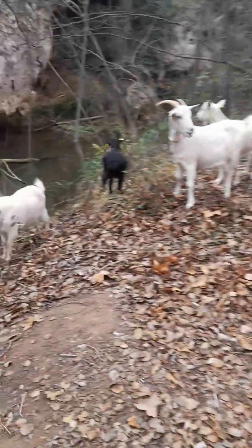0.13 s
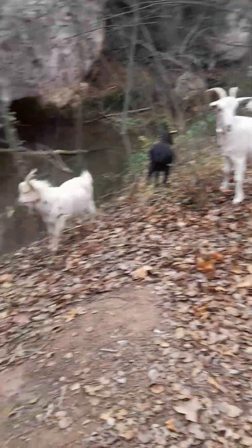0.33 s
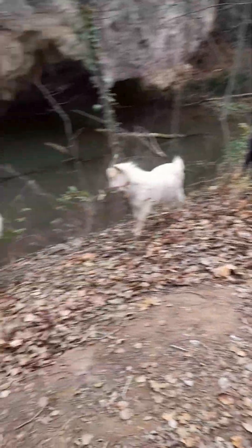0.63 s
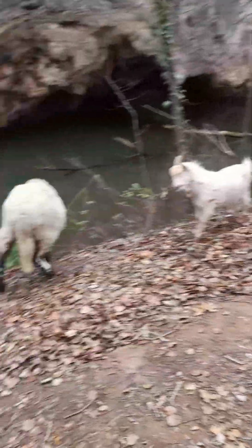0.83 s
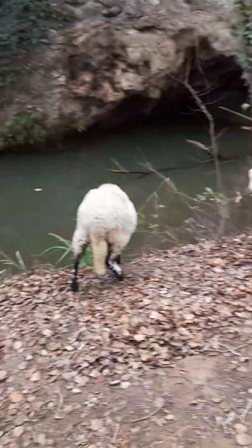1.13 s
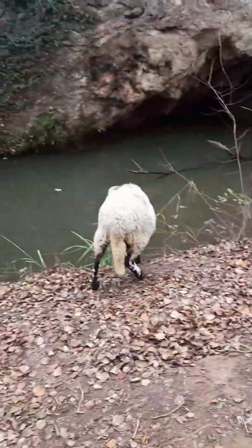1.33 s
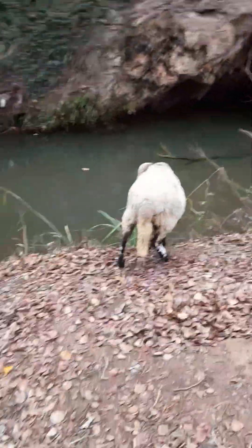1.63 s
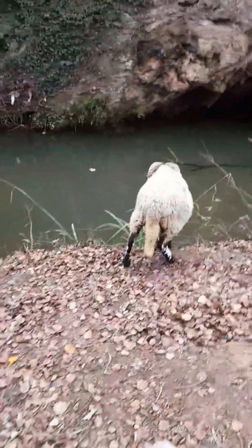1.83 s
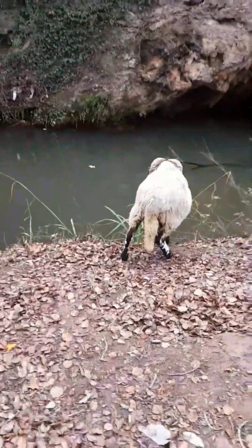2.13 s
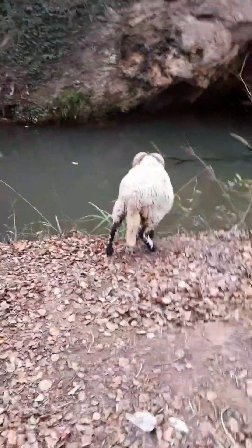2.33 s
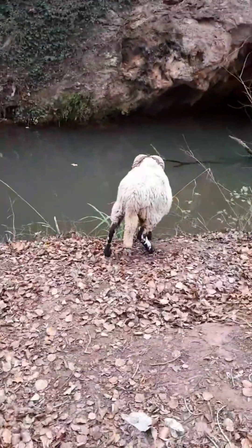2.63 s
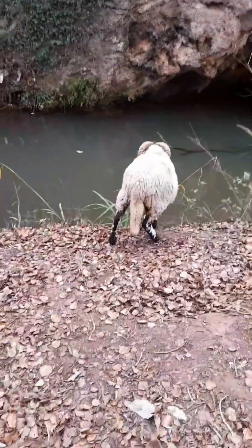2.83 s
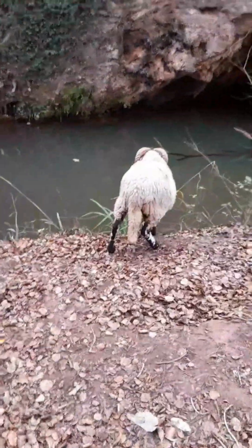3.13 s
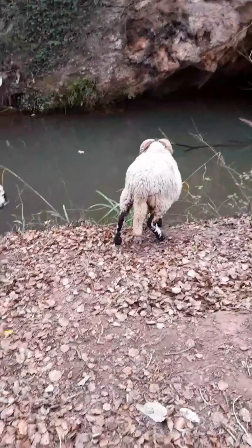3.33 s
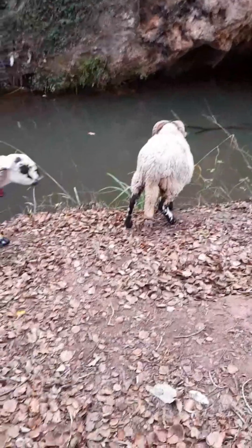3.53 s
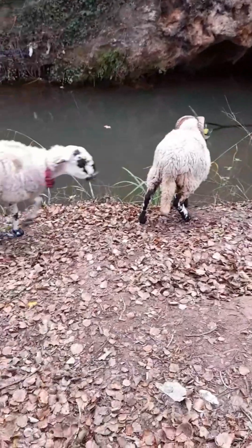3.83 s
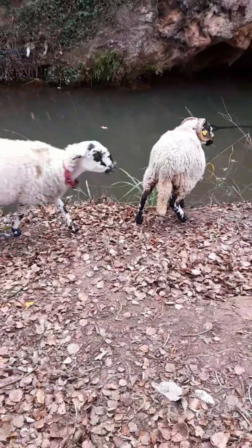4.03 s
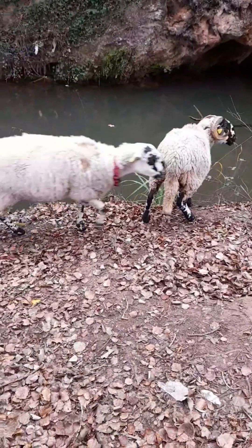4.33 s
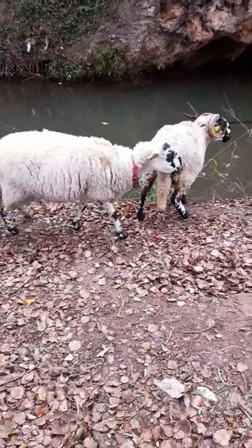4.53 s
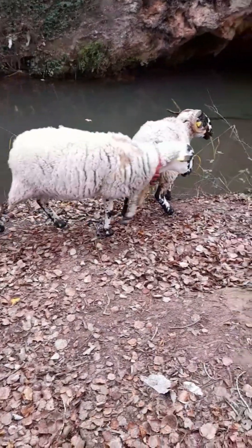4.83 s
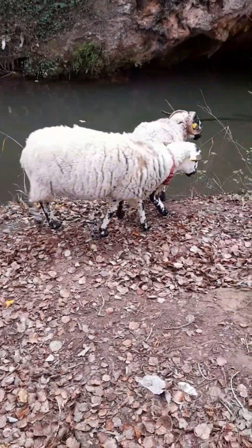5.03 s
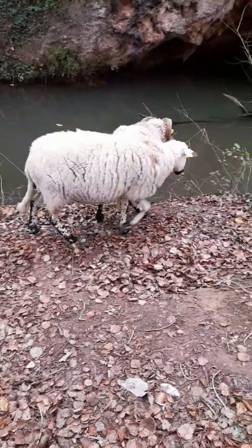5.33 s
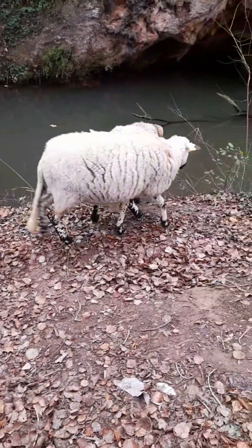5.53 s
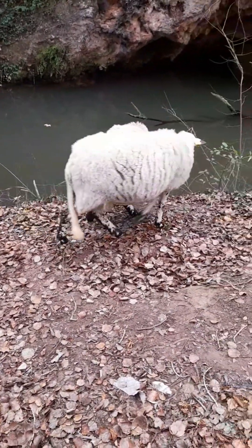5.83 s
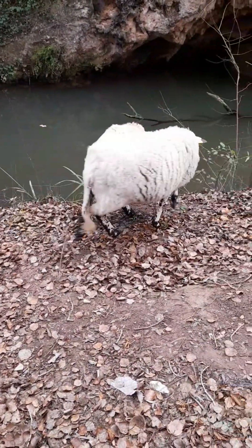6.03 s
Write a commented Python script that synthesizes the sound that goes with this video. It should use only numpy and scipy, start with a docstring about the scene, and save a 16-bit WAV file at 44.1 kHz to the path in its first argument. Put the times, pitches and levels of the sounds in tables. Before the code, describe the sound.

In a quiet outdoor spot, dry leaves crunch under shoes right by the microphone, with a short squeak of rubber midway through the steps. The walking ends, and lighter sounds take over from a little way in front: sheep treading and dragging their legs through the leaves in brief, crisp bursts with small gaps. Sharp little stem snaps are scattered throughout, over a faint hush and barely audible clothing.

```python
"""Footsteps and sheep in dry leaves

On the bank of a still stream a walker takes a few steps and stops, one sole squeaking by stick-slip
friction. Then sheep a few metres ahead shuffle through the litter. Each tread is a swarm of tiny
brittle fractures over a thud of soil; single stems snap, and clothes stir in a faint outdoor hush."""
import sys
import numpy as np
from scipy import signal
from scipy.fft import rfft, irfft, next_fast_len
from scipy.io import wavfile
from scipy.ndimage import uniform_filter1d, map_coordinates

SR = 44100
rng = np.random.default_rng(int(sys.argv[2]) if len(sys.argv) > 2 else 0)


def log_audio(samples):
    """Write samples as a 16-bit WAV file to the path given in sys.argv[1]."""
    # one column per channel
    frames = np.atleast_2d(samples).T
    # limit to full scale, then quantise
    limited = np.clip(frames, -1, 1)
    pcm = np.round(limited * 32767).astype(np.int16)
    wavfile.write(sys.argv[1], SR, pcm)


N = 273420
TIME = np.arange(N) / SR
FOOT_LAG_MS = 0.495  # the walker's feet reach the left ear this much later

# The push of the shoes through the leaves. Each row: time in seconds, relative level in dB.
SHOE_PUSH = [(0.0, -44), (0.14, -36.5), (0.27, -35.5), (0.36, -37), (0.415, -32.5), (0.445, -43),
             (0.54, -53), (0.635, -47), (0.685, -52.5), (0.75, -47.5), (0.92, -43), (1.06, -36.5),
             (1.17, -38.5), (1.28, -37), (1.42, -41), (1.6, -41.5), (1.8, -41.5), (1.92, -58)]
# Snapping stems. Each row: start in seconds, level in dB, centre frequency in Hz,
# left minus right level in dB, splintering time in ms.
STEM_SNAPS = [(0.0823, -31, 8000, -10, .8), (0.153, -29.5, 1950, -3, 3), (0.1627, -32, 4090, -8, 2.7),
              (0.1794, -32, 4000, -1, 1.5), (0.2381, -22, 9600, -13, 0.87), (0.2622, -25, 10600, -8, 1),
              (0.332, -24, 7800, -11, 2.1), (0.3916, -29, 10400, -9, 1), (0.3994, -23, 10400, -8, 2.5),
              (0.41, -32, 2400, 2, 1.7), (0.4693, -39, 10200, -9, .8), (0.477, -28.5, 9700, -13, .8),
              (0.4978, -42, 8000, -13, 0.83), (0.5759, -29.5, 11900, -5, 1.1), (0.6354, -42, 3520, 2, 2),
              (0.7798, -33, 8000, -11, 1.3), (0.8765, -25, 10400, -11, 1.6), (0.8963, -35, 8500, -9, .8),
              (0.9331, -33, 9500, -8, 0.93), (1.17, -31, 4200, -3, 1.8), (1.2666, -24.5, 11000, -10, .6),
              (1.2893, -23, 10500, -11, 1), (1.3196, -29, 12000, -9, 1.2), (1.3685, -30, 12000, -9, .7),
              (1.488, -30, 13500, -9, .6), (1.4912, -27.5, 12000, -13, .7), (1.5317, -34, 13500, -12, .6),
              (1.5409, -25, 12200, -20, 0.89), (1.552, -35, 10100, -18, 0.49), (1.585, -37, 4500, -8, 1.5),
              (1.6504, -31, 10200, -15, 0.73), (1.6672, -33.5, 6800, -12, 1.5),
              (1.6763, -25, 6450, -10, 0.87), (1.703, -30, 1900, -15, 1.3), (1.709, -32.5, 2300, -2, 1.8),
              (1.714, -26, 12300, -10, 0.81), (1.7353, -28.5, 11000, -8, .6), (1.7392, -29, 9600, -7, 2),
              (1.7857, -35.5, 3500, -1, 1.6), (1.7963, -35.5, 2500, -9, 2), (1.803, -36, 3500, -6, 2),
              (1.815, -34, 10000, -8, 1.1), (1.8264, -38, 9000, -4, .8), (1.851, -37.5, 7000, -6, 0.76),
              (1.8574, -30.5, 6300, -10, 1.1), (1.875, -38, 6300, -9, .8), (1.8935, -37.5, 10100, -2, 1.1),
              (1.9036, -45, 9500, -6, 0.5), (1.9305, -39, 10400, -2, .6), (2.0415, -37, 7500, -10, .8),
              (2.1934, -46, 8350, -19, .8), (2.239, -55, 4970, -10, 1), (2.255, -50, 4970, -14, 1.6),
              (2.4317, -34, 10400, -5, 0.76), (2.4672, -33, 8500, -9, 1.1), (2.5723, -35.5, 7100, -7, 0.76),
              (2.5894, -35, 9500, -4, .8), (2.606, -46, 2520, -4, 1.5), (2.783, -34, 13200, -11, 0.68),
              (2.9384, -37.5, 9900, -4, 1.5), (2.9752, -46, 9650, -3, 0.88), (2.9906, -32, 6800, -11, 1.13),
              (3.009, -35, 12100, -11, .8), (3.0734, -50, 6300, -4, 1.05), (3.1151, -38, 12000, -2, .7),
              (3.1902, -42.5, 3470, -2, 1.9), (3.3817, -41, 10000, -7, 1.8), (3.4274, -40, 9600, -2, .8),
              (3.497, -42.5, 9500, 5, .8), (3.5257, -38, 10300, -3, 0.72), (3.6697, -49, 8000, -4, .8),
              (3.8103, -31, 11000, -3, 0.9), (3.868, -36, 6940, -6, 1.2), (3.8805, -27.5, 8050, 0, 1.5),
              (3.9384, -37, 9000, -6, 1.5), (3.9484, -42, 12500, -4, 0.89), (4.0385, -37.5, 10000, 0, 1.9),
              (4.2093, -45.5, 4200, 0, 0.54), (4.3908, -40, 11500, -4, 1.2), (4.6531, -38, 9500, 1, 0.92),
              (4.9205, -48, 9000, 0, 1), (5.055, -50, 9500, -4, .7), (5.15, -49, 9500, -7, 0.85),
              (5.1646, -47, 10500, -9, 0.76), (5.2237, -49, 8500, -5, 1.5), (5.2632, -30.5, 5030, -4, 1),
              (5.5004, -45, 9000, -12, 0.95), (5.5566, -41, 3240, -1, 1.2), (5.575, -33, 5530, -4, 1.45),
              (5.6254, -28, 10100, 2, 0.54), (5.6325, -31, 11500, -3, 3.6), (5.646, -46, 9000, -1, .7),
              (5.6757, -42.5, 6500, -4, 0.71), (5.762, -37, 5840, 0, 0.8), (5.859, -48, 4850, -5, 1.1),
              (6.0738, -45, 9000, -2, 0.69), (6.084, -37, 7500, -2, 0.9), (6.118, -31, 7600, -2, 1.32),
              (6.193, -36, 12000, -2, 1)]
# A heel or sole takes the weight. Each row: peak time in seconds, thud in dB, crunch in dB.
FOOTFALL_PEAKS = [(0.105, -56, -46), (0.2, -57, -56), (0.41, -65, -46), (1.07, -51, -48),
                  (1.105, -52.5, -54), (1.168, -55.5, -50), (1.27, -64, -46), (1.325, -60, -58),
                  (1.54, -61, -53), (1.585, -57, -48), (1.665, -63, -47), (1.708, -57, -41),
                  (1.795, -60, -44), (1.856, -52, -48)]
# The squeak. Each row: time in seconds, pitch in Hz, relative levels of fundamental and overtones in dB.
SQUEAK_CURVE = [(1.278, 1463, -70, -80), (1.288, 1594, -35, -48), (1.297, 1688, -31, -26),
                (1.322, 1680, -36, -24.5), (1.342, 1708, -34.5, -33), (1.364, 1670, -36, -36),
                (1.381, 1585, -29.5, -42), (1.397, 1405, -56, -42), (1.418, 1460, -70, -46)]
# Its overtones, with a half order from uneven slips. Each row: multiple of the pitch, relative dB.
SQUEAK_OVERTONES = [(2.5, -19), (3, -14), (4, 0), (5, -21), (6, -12), (7, -6), (8, -9), (9, -13)]
# The sliding sole's chirps. Each row: start and end in seconds, first and last pitch in Hz, relative dB.
SOLE_CHIRPS = [(1.212, 1.24, 9600, 8150, -28), (1.232, 1.258, 2250, 2170, -41),
               (1.258, 1.289, 2185, 2300, -38), (1.264, 1.365, 9700, 9380, -33),
               (1.328, 1.364, 11170, 10950, -33), (1.318, 1.362, 13100, 12800, -34),
               (1.33, 1.358, 4250, 4220, -43), (1.379, 1.408, 2520, 2180, -41),
               (1.378, 1.42, 1130, 1180, -41), (1.405, 1.447, 1660, 1880, -40),
               (1.38, 1.445, 6800, 7000, -41)]
# The stirring of the walker's clothes. Each row: time in seconds, relative level in dB.
CLOTHES_STIR = [(1.95, -71), (2.33, -86), (2.45, -69.5), (2.68, -66), (2.85, -89), (3.03, -81.5),
                (3.32, -65.5), (3.68, -78.5), (3.97, -75.5), (4.3, -82), (5.06, -85), (5.27, -71.5),
                (5.7, -77), (5.95, -86), (6.2, -70)]
# Legs dragging through leaves. Each row: start in seconds, end in seconds, relative level in dB.
LEG_DRAGS = [(1.898, 2.26, -49), (2.334, 2.562, -46), (2.62, 2.735, -43.5), (2.932, 3.013, -44.5),
             (3.223, 3.522, -48), (3.732, 3.984, -47.5), (4.387, 4.51, -53), (4.644, 4.707, -53.5),
             (4.988, 5.196, -59.5), (5.223, 5.277, -41.5), (5.313, 5.46, -59), (5.622, 5.66, -47),
             (5.743, 5.83, -55), (6.006, 6.138, -48)]
# Hoof treads. Each row: peak time in seconds, relative level in dB, swell and fade times in seconds,
# offset in dB for the crushing, which grows with the weight carried.
HOOF_TREADS = [(2.112, -40, 0.026, 0.0085, -13), (2.446, -35, 0.03, 0.03, -14.5),
               (2.476, -34.5, 0.025, 0.023, -11.5), (2.709, -34.5, .018, .016, -14.5),
               (2.998, -35.5, 0.039, 0.019, -22), (3.239, -34.5, 0.03, 0.036, -10),
               (3.291, -36, 0.017, 0.015, -12), (3.49, -50, 0.032, .014, -23),
               (3.738, -43, 0.016, .016, -26), (3.794, -37.5, 0.026, 0.021, -11),
               (3.868, -38.5, .04, 0.03, -13.5), (3.95, -39.5, 0.016, .026, -11.5),
               (4.101, -42, 0.01, 0.017, -11.5), (4.212, -48.5, .008, 0.021, -6),
               (4.431, -38.5, 0.022, .01, -29), (4.482, -44, 0.011, .016, -12.5),
               (4.717, -45, 0.0099, 0.0078, -12), (4.975, -46, .02, 0.022, -12.5),
               (5.264, -36, 0.016, 0.015, -12), (5.385, -44, 0.073, 0.042, -33),
               (5.575, -36, 0.033, .015, -3), (5.761, -37, 0.021, 0.013, -14),
               (5.829, -40.5, 0.03, 0.013, -13.5), (6.116, -40, 0.013, .006, -10)]
# Bearing of the moving sheep. Each row: time in seconds, left ear's lag in ms, left minus right in dB.
SHEEP_BEARING = [(1.9, 0.15, -7.5), (2.45, 0.13, -2), (3.45, 0.12, -2), (3.75, 0.035, -1), (6.2, 0, -2)]

# Noise spectra. Each row: frequency in Hz, relative spectral density in dB.
SHOE_CRACKLE_SPECTRUM = [(1500, -33), (3200, -9.5), (4200, -5.5), (5200, -10), (6300, -6), (7300, 0.5),
                         (8500, -10.5), (10100, 3.5), (11800, -6), (13500, 2), (15600, -9.5)]
SHOE_CRUSH_SPECTRUM = [(200, -30), (450, -2.5), (750, -1), (1200, 2), (1900, 0.5), (3000, -3), (4500, -1),
                       (7000, -3.5), (14000, -8)]
SOIL_SPECTRUM = [(25, -33), (60, -41), (100, -5.5), (150, -7), (260, 1.5), (450, -2.5), (800, 6),
                 (2000, -20)]
HUSH_SPECTRUM = [(25, -12), (60, -1.5), (120, -1.5), (250, 0.5), (450, -9), (700, -3), (950, 4.5),
                 (1400, 1.5), (2300, -2), (5000, 1), (7500, -4.5), (10000, 1.5), (16000, -5.5)]
THUD_SPECTRUM = [(50, -32), (90, -21), (140, -6), (200, -7), (280, 1.5), (400, -13), (900, -32)]
CRUNCH_SPECTRUM = [(200, -19), (430, 0), (700, -4), (1000, 5.5), (1800, -5), (3000, -14.5), (9000, -33)]
CLOTHES_SPECTRUM = [(50, -17), (130, -13.5), (250, -0.5), (450, -0.5), (700, -3), (1500, -15)]
HOOF_CRACKLE_SPECTRUM = [(900, -25.5), (2000, -38), (3300, -8), (5500, -1), (7000, 0), (8200, -1),
                         (10200, 5.5), (13000, 3), (15600, -1.5)]
EDGE_LITTER_SPECTRUM = [(250, -24), (450, -5), (620, -8), (850, 5.5), (1100, 0), (1600, 0.5), (2700, 2.5),
                        (4500, 5.5), (9000, -27)]
DRY_LITTER_SPECTRUM = [(250, -26), (480, -30), (650, -10), (820, -1), (1150, -11), (1650, -1), (2100, -2.5),
                       (2750, 1.5), (4000, -1), (5000, 0), (9000, -10)]

# Likeness of the sound at the two ears. Each row: frequency in Hz, shared fraction of the power.
FOOT_COHERENCE = [(60, 0.46), (300, 0.98), (2000, 0.54), (4500, 0.94), (8000, 0), (15000, 0)]
HUSH_COHERENCE = [(50, 0.16), (300, 0.86), (1000, 0.88), (2000, 0.17), (8000, 0.037)]
HOOF_COHERENCE = [(100, 0.42), (800, 0.81), (3000, 1), (8000, 0.28), (15000, 0.36)]


def from_db(db):
    """Amplitude grows tenfold for every 20 dB."""
    return 10 ** (np.asarray(db) / 20)


def rms_one(x):
    """Division by the root mean square gives unit power."""
    return x / np.sqrt(np.mean(x ** 2) + 1e-20)


def in_time(rows):
    """Linear interpolation gives each column of a curve at every sample."""
    times, *columns = np.transpose(rows)
    return [np.interp(TIME, times, column) for column in columns]


def over_hz(points, size):
    """Interpolation in log frequency gives a curve at every FFT bin."""
    hz, value = np.transpose(points)
    return np.interp(np.log(np.fft.rfftfreq(size, 1 / SR) + 1), np.log(hz), value)


def drift(per_s):
    """Random values joined by straight lines form a fluctuation of unit power."""
    knots = rng.standard_normal(8000)
    return rms_one(np.interp(TIME * per_s, np.arange(len(knots)), knots))


def die_away(x, seconds):
    """Exponential decay spreads each impulse into a tail of equal area."""
    pole = np.exp(-1 / (seconds * SR))
    return signal.lfilter([1 - pole], [1, -pole], x + 1e-18)


def stereo_noise(power, spectrum, coherence):
    """Partly coherent noise of unit power: direct sound is common to both ears, scatter is not."""
    size = next_fast_len(N, real=True)
    direct, *scatter = rfft(np.sqrt(power) * rng.standard_normal((3, N)), size)
    shared = over_hz(coherence, size)
    ears = np.sqrt(shared) * direct + np.sqrt(1 - shared) * np.array(scatter)
    return rms_one(irfft(ears * from_db(over_hz(spectrum, size)), size)[:, :N])


def even(x):
    """Division by the running amplitude levels out the chance swells of a noise."""
    return x / np.sqrt(uniform_filter1d(np.mean(x ** 2, axis=0), size=900) + 1e-9)


def place(x, lag_ms, pan_db):
    """Direction is heard from the left ear's lag and its level relative to the right."""
    left, right = np.broadcast_to(x, (2, N))
    left = map_coordinates(left, [np.arange(N) - lag_ms * SR / 1000], order=3)
    ratio = from_db(pan_db)
    return np.array([left * ratio, right]) * np.sqrt(2 / (1 + ratio ** 2))


def fractures(per_s, spread_db, decay_s, clump_db, rub_share):
    """Brittle fracture releases power in clumped, unequal pulses above the rub of leaf on leaf."""
    sizes = from_db(spread_db * np.minimum(rng.standard_normal(N), 2.5))
    cracks = die_away((rng.random(N) < per_s / SR) * sizes ** 2, decay_s)
    return ((1 - rub_share) * cracks / cracks.mean() + rub_share) * from_db(clump_db * drift(170)) ** 2


def leaf_ticks(per_s, spread_db, low_hz, high_hz=15000, cycles=11, pitches=11):
    """A cracking leaf is a damped resonator, falling by 60 dB in the given number of cycles."""
    out, per_pitch = np.zeros((2, N)), round(per_s * N / SR / pitches)
    for hz in np.geomspace(low_hz, high_hz, pitches):
        when, chance, sign, side = rng.random((per_pitch, 4)).T
        size = from_db(spread_db * np.minimum(-np.log(1 - chance), 3)) * np.sign(sign - 0.5)
        clicks = np.full((2, N), 1e-18)
        clicks[:, (when * N).astype(int)] = size * np.sqrt([side, 1 - side])
        radius, angle = np.exp(-np.log(1000) * hz / (cycles * SR)), 2 * np.pi * hz / SR
        ring = signal.lfilter([1, 0, -1], [1, -2 * radius * np.cos(angle), radius ** 2], clicks)
        out += rms_one(ring) * np.sqrt(hz)
    return rms_one(out)


def leaf_reflection(x, delay_ms, strength):
    """An echo from moving leaves interferes with the direct sound, so its colour keeps shifting."""
    out = []
    for ear in x:
        lag = delay_ms * SR / 1000 * np.exp(0.5 * drift(14))
        earlier = np.maximum(np.arange(N) - lag.astype(int), 0)
        echo_gain = strength * drift(25)
        out.append((ear + echo_gain * ear[earlier]) / np.sqrt(1 + echo_gain ** 2))
    return np.array(out)


def shoes():
    """Under a moving load the top leaves fracture, the layer beneath is crushed and the soil rumbles."""
    push_db, = in_time(SHOE_PUSH)
    walking = np.interp(TIME, [1.9, 2.0], [1, 0])
    settled = np.interp(TIME, [1.41, 1.51], [0, 1])
    sweeping = fractures(per_s=2500, spread_db=3.5, decay_s=0.00013, clump_db=1.2, rub_share=0.62)
    swish = stereo_noise(sweeping, SHOE_CRACKLE_SPECTRUM, FOOT_COHERENCE)
    ticks = leaf_ticks(per_s=1100, spread_db=3.4, low_hz=2000)
    tick_share = 0.2 + 0.35 * settled  # as the weight settles, leaves break one by one
    crackle = np.sqrt(1 - tick_share) * swish + np.sqrt(tick_share) * ticks
    crackle = leaf_reflection(crackle, delay_ms=1.2, strength=0.35)
    crushing = fractures(per_s=680, spread_db=5.5, decay_s=0.00068, clump_db=1.0, rub_share=0.77)
    crush = stereo_noise(crushing, SHOE_CRUSH_SPECTRUM, FOOT_COHERENCE)
    rumble = even(stereo_noise(1, SOIL_SPECTRUM, FOOT_COHERENCE))
    rumble *= np.interp(TIME, [1.89, 1.96], [1, 0])  # the last foot has come down
    top = crackle * from_db(push_db + 2.5 - 2 * settled)
    body = crush * from_db(push_db - 4) + rumble * from_db(-44.5 + 0.39 * push_db + 7 * settled)
    return walking * (place(top, FOOT_LAG_MS, pan_db=-9) + place(body, FOOT_LAG_MS, pan_db=-2.5))


def outdoor_hush():
    """Ambient noise is faint and broadband, with a slight random modulation of its level."""
    waver = from_db(0.7 * drift(60))
    hush = from_db(-61.5) * stereo_noise(waver ** 2, HUSH_SPECTRUM, HUSH_COHERENCE)
    return place(hush, lag_ms=0, pan_db=-3)


def stem_snaps(fibre_db=-9, scatter_db=-27, scatter_s=0.007, skirt_db=-6, splinters=3):
    """Fracture impulses excite a stem's damped resonance; nearby leaves scatter a short tail."""
    size = 1500
    out, t = np.zeros((2, N + size)), np.arange(size) / SR
    scatter = from_db(scatter_db) * np.exp(-t / scatter_s)
    for start, db, hz, pan_db, splinter_ms in STEM_SNAPS:
        splinter_s = splinter_ms / 1000
        burst = (from_db(fibre_db) * np.exp(-t / splinter_s) + scatter) * rng.standard_normal((2, size))
        burst[:, 4] += 3  # the first crack is the strongest
        splinter_at = (rng.uniform(0.2, 1.2, splinters) * splinter_s * SR).astype(int)
        burst[:, splinter_at] += rng.uniform(0.6, 1.4, splinters) * rng.choice([-1, 1], splinters)
        narrow, wide = np.clip([[0.76 * hz, 1.3 * hz], [0.25 * hz, 1.8 * hz]], 500, 17000)
        ring = signal.sosfilt(signal.butter(2, narrow, "band", fs=SR, output="sos"), burst)
        skirt = signal.sosfilt(signal.butter(1, wide, "band", fs=SR, output="sos"), burst)
        snap = ring + from_db(skirt_db) * skirt
        snap /= np.sqrt(np.mean(snap[:, :SR // 500] ** 2, axis=1, keepdims=True))  # unit power over 2 ms
        ears = np.array([[from_db(pan_db)], [1]])
        at = round(start * SR)
        out[:, at:at + size] += from_db(db) * snap * ears / np.linalg.norm(ears)
    under_shoes = TIME < SHEEP_BEARING[0][0]
    sheep_lag_ms, _ = in_time(SHEEP_BEARING)
    return place(out[:, :N], np.where(under_shoes, FOOT_LAG_MS, sheep_lag_ms), pan_db=0)


def tread_power(peak_s, db, swell_s, fade_s):
    """The power of a tread rises as a Gaussian to its peak, then decays exponentially."""
    power, peak = np.zeros(N), round(peak_s * SR)
    near = slice(max(peak - SR // 4, 0), peak + SR // 4)
    since = TIME[near] - peak_s
    decay = np.where(since < 0, (since / swell_s) ** 2, since / fade_s)
    power[near] = from_db(db) ** 2 * np.exp(-2 * np.minimum(decay, 20))
    return power


def footfalls():
    """The impact of the walker's weight collapses packed leaves in a crunch and makes the soil thud."""
    thud = even(stereo_noise(1, THUD_SPECTRUM, FOOT_COHERENCE))
    collapse = fractures(per_s=500, spread_db=7.5, decay_s=0.00053, clump_db=1.5, rub_share=0.34)
    crunch = even(stereo_noise(collapse, CRUNCH_SPECTRUM, FOOT_COHERENCE))
    thud_power = sum(tread_power(s, db, swell_s=0.011, fade_s=0.024) for s, db, _ in FOOTFALL_PEAKS)
    crunch_power = sum(tread_power(s, db, swell_s=0.011, fade_s=0.014) for s, _, db in FOOTFALL_PEAKS)
    return place(thud * np.sqrt(thud_power) + crunch * np.sqrt(crunch_power), FOOT_LAG_MS, pan_db=-7)


def sole_squeak():
    """Stick-slip friction of rubber gives a wavering tone with a strong fourth partial, amid chirps."""
    hz, fundamental_db, overtone_db = in_time(SQUEAK_CURVE)
    phase = 2 * np.pi * np.cumsum(hz * (1 + 0.0017 * drift(360))) / SR
    jitter = 0.085 * drift(500)  # uneven slips smear the partials
    overtones = sum(from_db(db + 1.6 * drift(170)) * np.sin(multiple * (phase + jitter))
                    for multiple, db in SQUEAK_OVERTONES)
    hiss_band = signal.butter(2, [7500, 14500], "band", fs=SR, output="sos")
    hiss = signal.sosfilt(hiss_band, rng.standard_normal(N))
    rasp = from_db(-8) * rms_one(hiss * (1 + np.cos(phase)) ** 2)  # rubber tears loose on every slip
    fundamental = from_db(fundamental_db + 2 * drift(300)) * np.sin(phase + 3 * jitter)
    out = fundamental + from_db(overtone_db) * (overtones + rasp)
    out *= (TIME > SQUEAK_CURVE[0][0]) & (TIME < SQUEAK_CURVE[-1][0])
    waver, flutter_db = 1 + 0.0052 * drift(500), 2.5 * drift(450)
    for start, end, start_hz, end_hz, db in SOLE_CHIRPS:
        near = (TIME > start) & (TIME < end)
        along = (TIME[near] - start) / (end - start)
        glide_hz = (start_hz + (end_hz - start_hz) * along) * waver[near]
        envelope = from_db(db + flutter_db[near]) * np.sin(np.pi * along)
        out[near] += envelope * np.sin(2 * np.pi * np.cumsum(glide_hz) / SR)
    return place(out * from_db(-4), FOOT_LAG_MS, pan_db=-7.5)


def clothes():
    """Friction of stirring cloth makes a soft, low noise once the walker stands."""
    standing = np.interp(TIME, [1.85, 1.95], [0, 1])
    stir_db, = in_time(CLOTHES_STIR)
    rustle = stereo_noise(from_db(1.4 * drift(40)) ** 2, CLOTHES_SPECTRUM, HUSH_COHERENCE)
    return place(standing * from_db(stir_db + 5) * rustle, lag_ms=0, pan_db=-5)


def drag_power(attack_s=0.002, onset_db=-0.5, onset_s=0.028, release_s=0.024):
    """A leg sliding through leaves yields power that rises quickly, holds and decays exponentially."""
    power = np.zeros(N)
    for start, end, db in LEG_DRAGS:
        near = slice(round(start * SR), round(end * SR) + SR // 4)
        since = TIME[near] - start
        attack = np.clip(since / attack_s, 0, 1) * from_db(onset_db * np.exp(-since / onset_s))
        release = np.exp(-np.clip((TIME[near] - end) / release_s, 0, 20))
        power[near] += (from_db(db) * attack * release) ** 2
    return power


def sheep():
    """Hooves and legs fracture leaves, adding in power; trodden leaves rustle on by elastic recovery."""
    crackle_power = drag_power()
    crush_power = from_db(-11.5) ** 2 * crackle_power
    thud_power = np.zeros(N)
    for peak_s, db, swell_s, fade_s, weight_db in HOOF_TREADS:
        crackle_power += tread_power(peak_s, db, swell_s, fade_s)
        crush_power += tread_power(peak_s, db + weight_db, swell_s, fade_s)
        thud_power += tread_power(peak_s, db=-69.5, swell_s=0.02, fade_s=0.048)
    recovery_power = from_db(-16) ** 2 * die_away(crackle_power, seconds=0.069)
    cracking = fractures(per_s=1200, spread_db=-0.5, decay_s=0.0003, clump_db=1.87, rub_share=0.24)
    crackle = stereo_noise(cracking, HOOF_CRACKLE_SPECTRUM, HOOF_COHERENCE)
    crushing = fractures(per_s=900, spread_db=6, decay_s=0.0005, clump_db=0.8, rub_share=0.5)
    # the first sheep treads thin, duller litter at the water's edge, the second the dry drift behind it
    at_edge = np.interp(TIME, [3.55, 3.7], [1, 0])
    crush = at_edge * stereo_noise(crushing, EDGE_LITTER_SPECTRUM, HOOF_COHERENCE)
    crush += (1 - at_edge) * stereo_noise(crushing, DRY_LITTER_SPECTRUM, HOOF_COHERENCE)
    leaves = from_db(-3.5) * np.sqrt(crackle_power + recovery_power) * crackle
    leaves += from_db(-0.5) * np.sqrt(crush_power + from_db(-4.5) * recovery_power) * crush
    ticks = leaf_ticks(per_s=190, spread_db=4, low_hz=5000)  # single leaves flick back
    leaves += from_db(-23) * np.sqrt(die_away(crackle_power, seconds=0.057)) * ticks
    soil = np.sqrt(thud_power) * stereo_noise(1, SOIL_SPECTRUM, HOOF_COHERENCE)
    return place(leaf_reflection(leaves, delay_ms=0.8, strength=0.92) + soil, *in_time(SHEEP_BEARING))


def scene():
    """By superposition, the pressures of all sources add at each ear."""
    walker = shoes() + footfalls() + sole_squeak()
    return walker + sheep() + stem_snaps() + outdoor_hush() + clothes()


def record(dry):
    """An elliptic low-pass filter cuts the highest treble steeply."""
    return signal.sosfilt(signal.ellip(12, 0.1, 90, 15950, fs=SR, output="sos"), dry)


dry = scene()
out = record(dry)
log_audio(out)
```